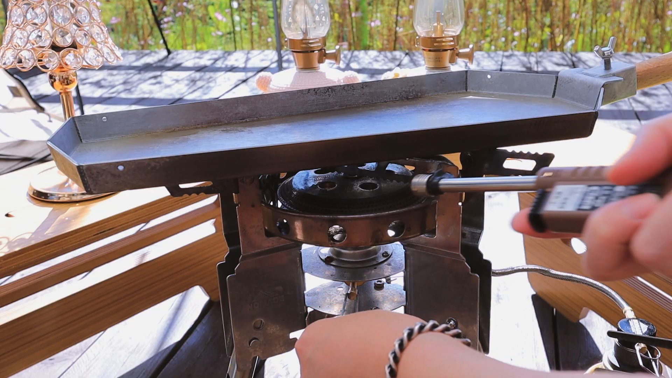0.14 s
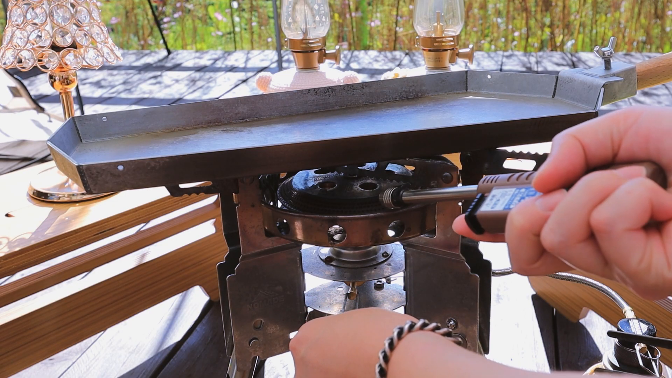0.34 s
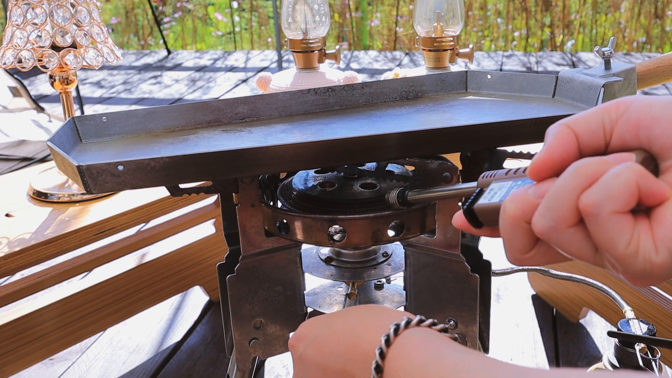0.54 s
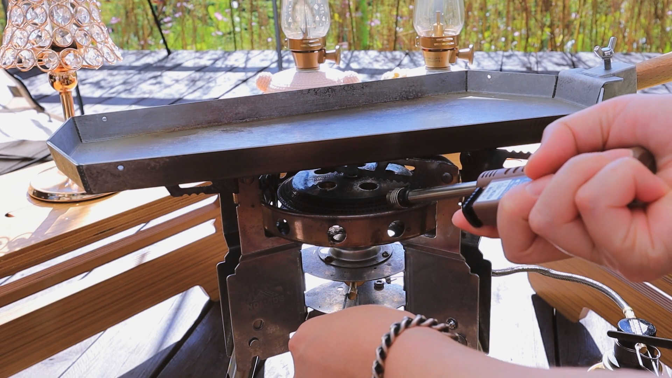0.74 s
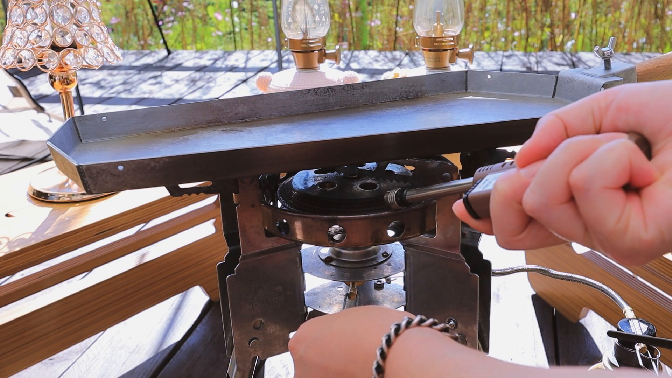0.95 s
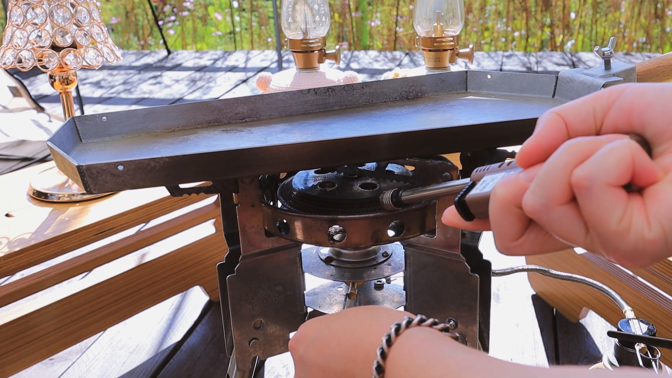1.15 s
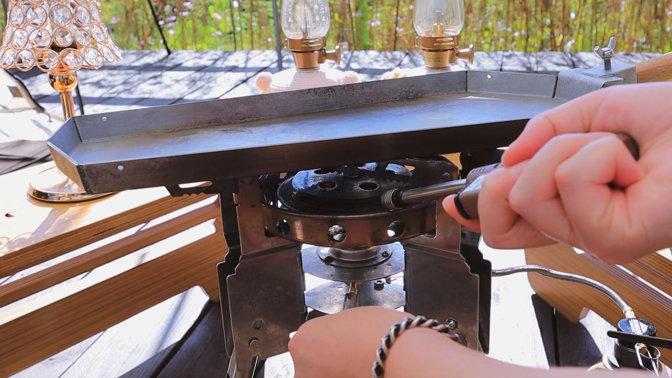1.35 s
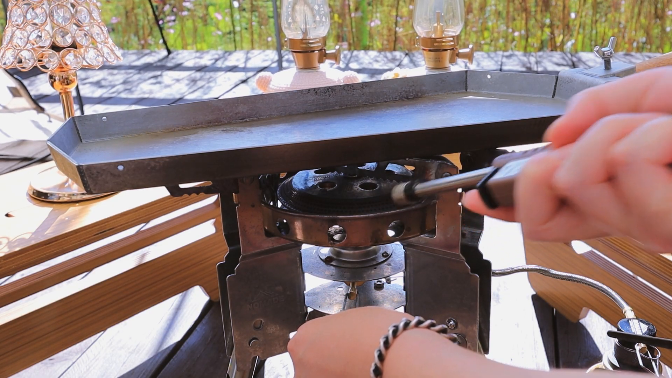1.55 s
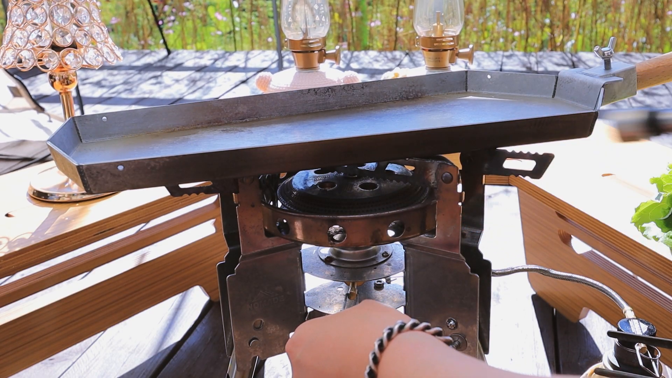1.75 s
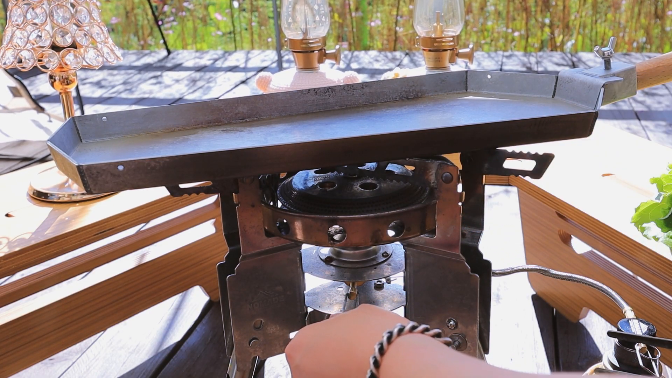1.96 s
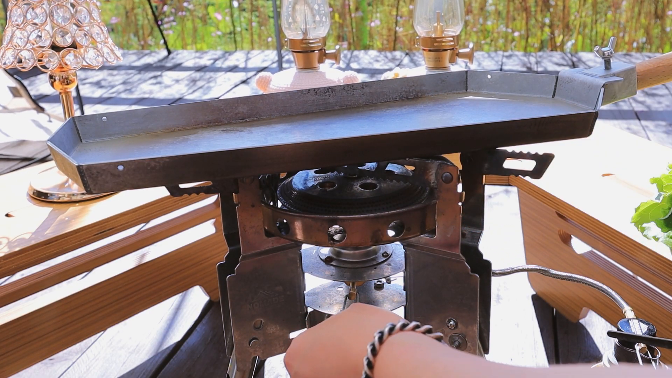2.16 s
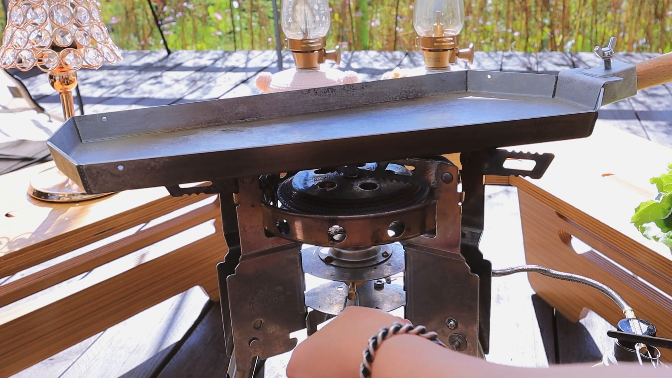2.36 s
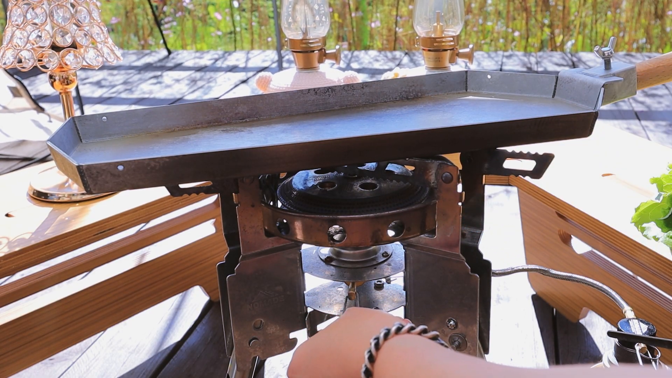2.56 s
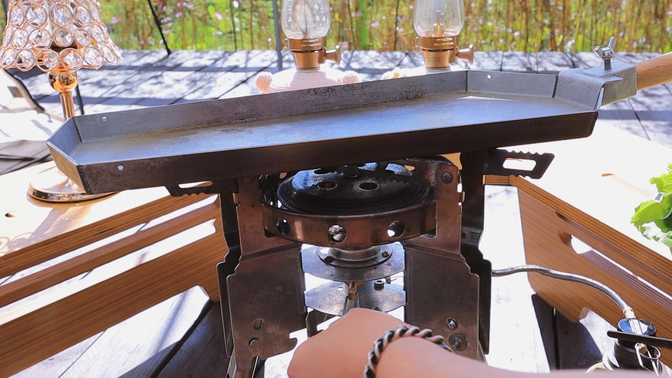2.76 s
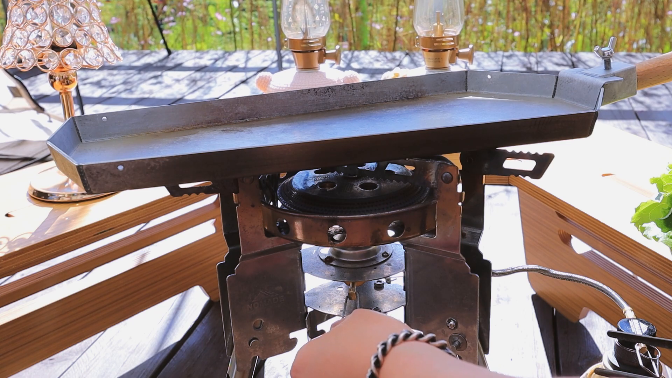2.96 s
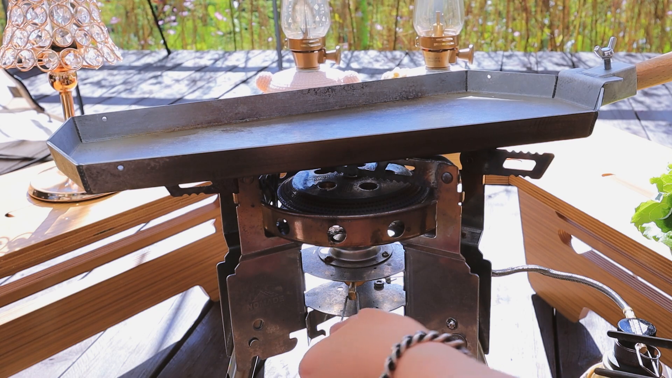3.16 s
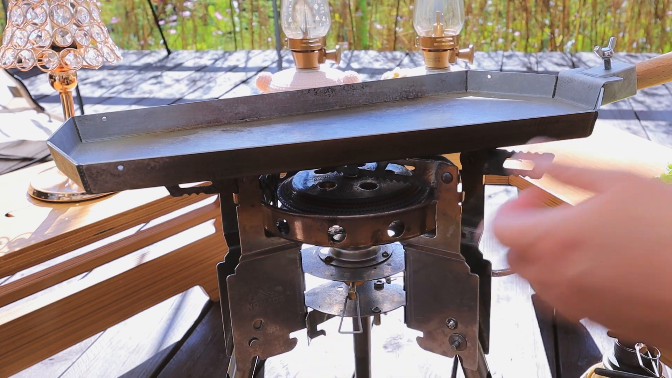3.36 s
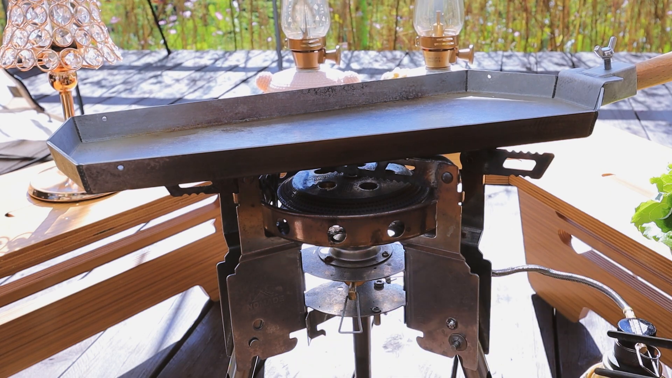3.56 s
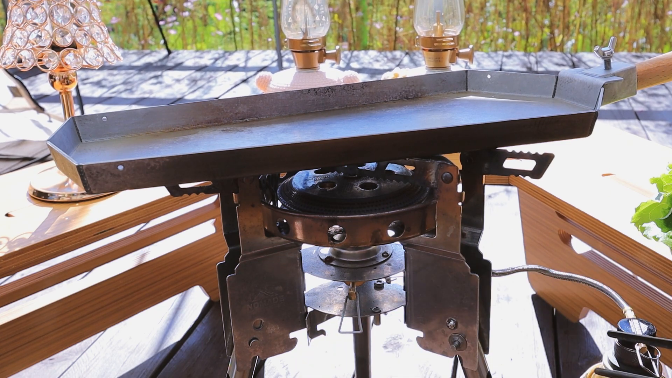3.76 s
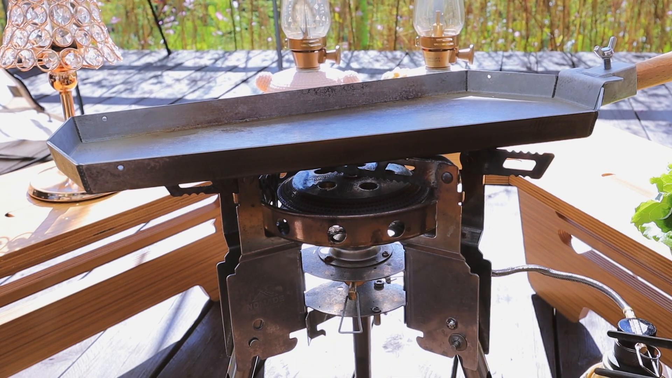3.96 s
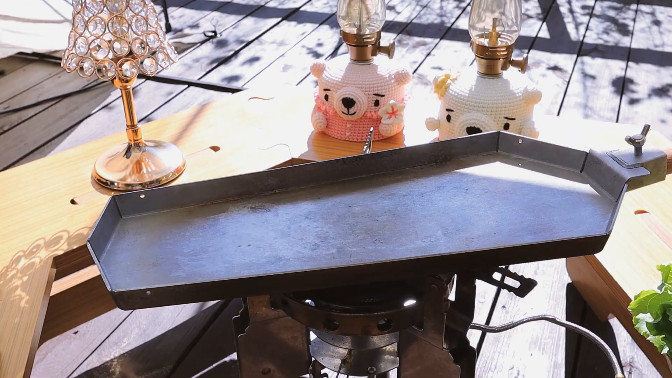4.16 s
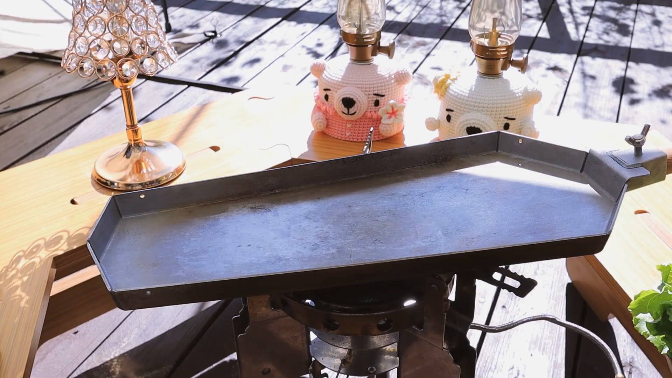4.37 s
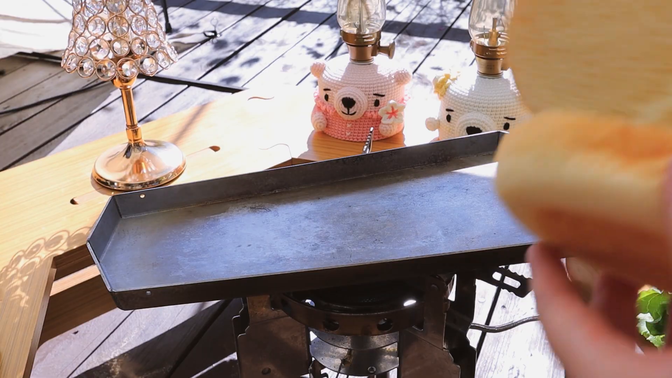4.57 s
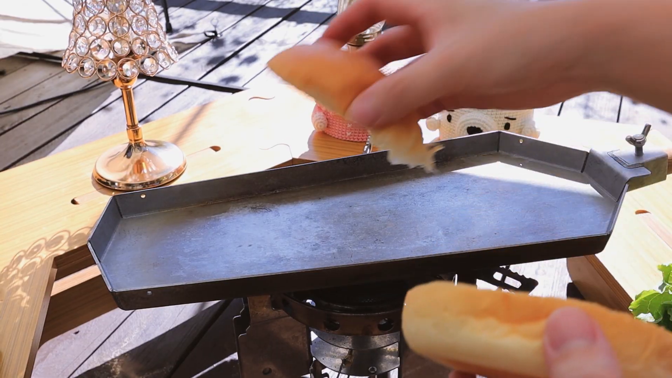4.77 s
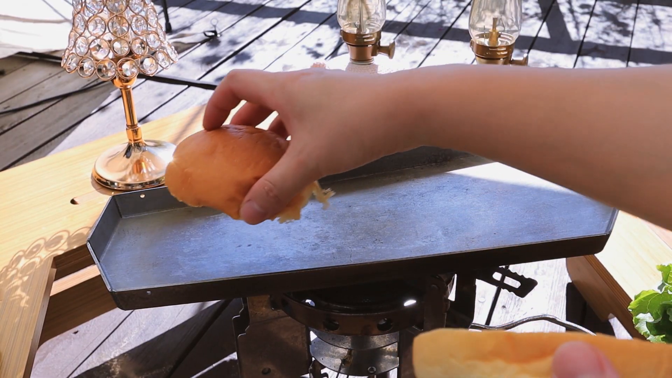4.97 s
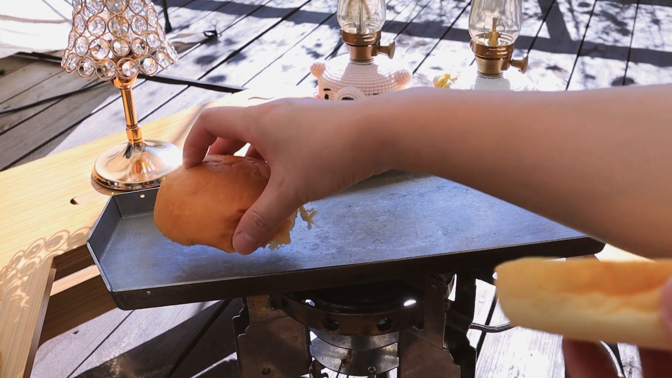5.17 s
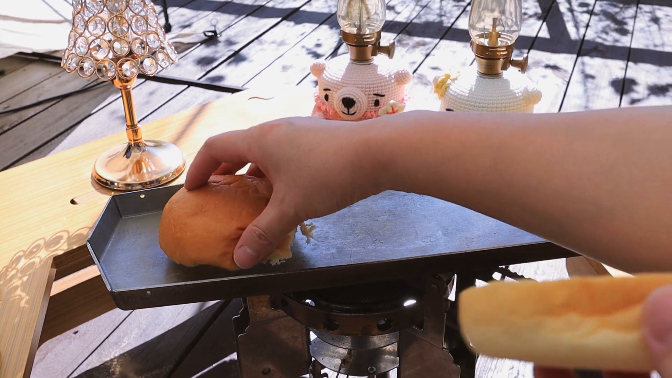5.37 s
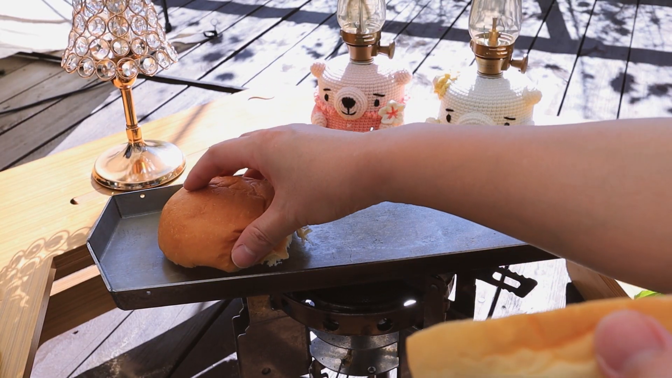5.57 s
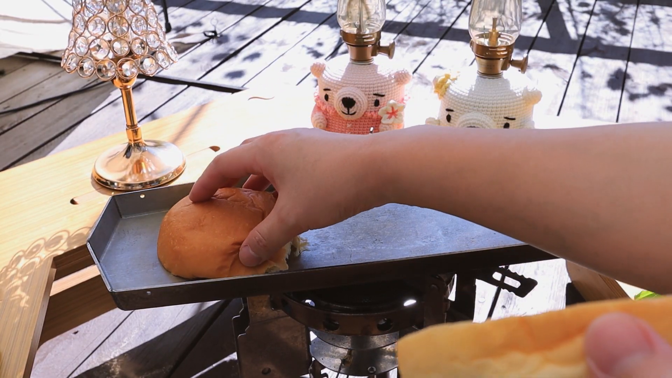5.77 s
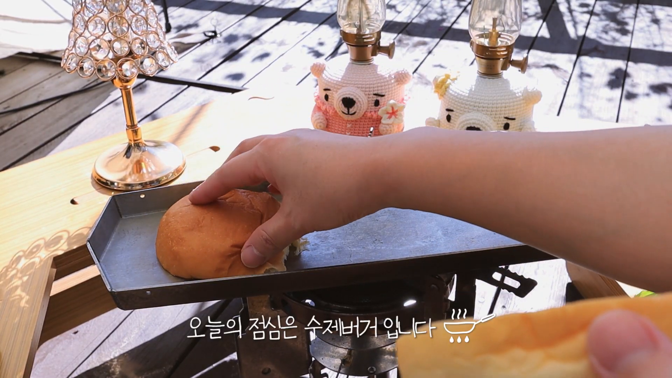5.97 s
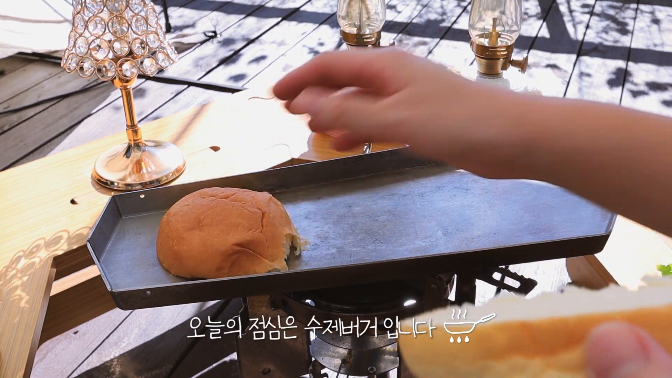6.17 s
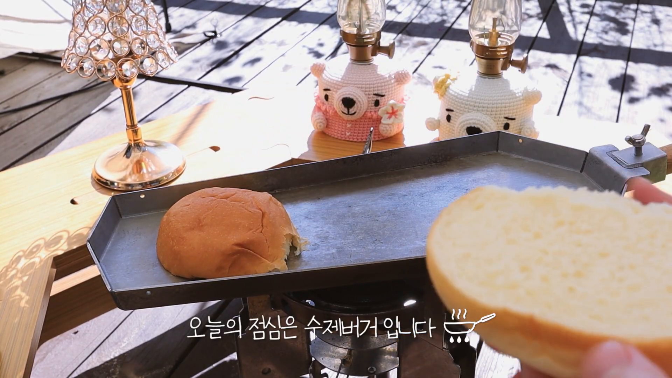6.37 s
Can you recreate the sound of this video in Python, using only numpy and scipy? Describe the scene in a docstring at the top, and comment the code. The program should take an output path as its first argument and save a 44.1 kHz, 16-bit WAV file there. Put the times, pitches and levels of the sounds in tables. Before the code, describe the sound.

Outdoors, close to a small gas stove, unlit gas hisses thinly from the start beneath a constant, very high shimmer of many bush crickets and faint open-air noise with a distant low drone. At 0.37 s steel clinks lightly and rings briefly. A piezo lighter snaps hard at 0.93 s, with a faint return click at 1.16. It snaps again at 1.40; at about 1.44 the gas catches in a short, low double puff, and a clearer release click follows at 1.65. From 2.1 to 2.4 s the hiss swells as the valve opens, with a thin whistle, a growing faint hum and low flame flutter, easing slightly after 2.8. At 4.21 s it abruptly changes to a hollow, muffled roar heard from above. Dry, pitched crust crackles cluster between 4.4 and 5.4 s, over fine crumbling; afterwards roar and crickets continue, with faint crumbling near 6.3.

```python
"""Gas hisses unlit from a camping stove on a wooden deck, amid the shimmer of bush crickets.
Metal clinks and a piezo lighter snaps twice, each by impulses that excite damped modes; the gas catches
with a puff of low noise. The valve is opened and the jet, filtered noise, excites the burner tube.
Then, from above the griddle, the flame is a hollow roar of shaped noise, and a crusty bun crackles
in short pitched bursts as it is laid on."""
import sys
import numpy as np
from scipy import signal
from scipy.fft import rfft, irfft
from scipy.io import wavfile

SR = 44100
rng = np.random.default_rng(int(sys.argv[2]) if len(sys.argv) > 2 else 0)


def generate_wav(signal):
    """Clip the signal to [-1, 1] and save it as 16-bit WAV at the path in sys.argv[1]."""
    frames = np.transpose(np.atleast_2d(signal))
    scaled = np.clip(frames, -1, 1) * 32767
    pcm = np.round(scaled).astype(np.int16)
    wavfile.write(sys.argv[1], SR, pcm)


N = 282917
T = np.arange(N) / SR   # time, s
HZ = np.maximum(np.fft.rfftfreq(N, 1 / SR), 1)   # frequency bins, Hz

# gas flow, given by the level of the jet's hiss: time_s, level_db
GAS_FLOW = [(0, -46.5), (.3, -47.5), (1.3, -45.5), (1.6, -48.5), (2.1, -48), (2.4, -41), (2.8, -40.5),
            (3.4, -42), (4.2, -43.5)]
# resonances of the burner tube and head: frequency_hz, bandwidth_hz, relative_level_db
TUBE_MODES = [(1138, 82, -8), (1572, 140, 0), (1823, 33, 2), (2230, 234, -4), (2735, 160, -7),
              (3070, 76, -5.5), (3530, 130, -11), (5320, 94, -2.5), (6390, 120, -1.5), (7340, 96, 0),
              (11210, 170, -11), (13600, 190, -11)]
# noise spectra, each of them: frequency_hz, relative_density_db (per Hz)
JET_SPECTRUM = [(300, 7), (500, 5.5), (950, -2.5), (2500, 7.5), (3700, 3), (4700, -23.5), (5800, 3),
                (7000, 10.5), (10200, -4), (12000, -8), (14500, -15), (16000, -21)]
FLAME_SIDE_SPECTRUM = [(25, -25), (50, -11.5), (90, -3), (140, -2.5), (190, 1.5), (245, -1), (305, -10.5),
                       (410, -8), (600, -14), (800, -16.5), (1100, -27), (2400, -74)]
FLAME_ABOVE_SPECTRUM = [(25, -27), (55, -10.5), (90, -6), (190, -2), (290, -9), (460, 1.5), (690, -3),
                        (790, -7.5), (980, -7), (1120, -17.5), (1900, -14), (2600, -25.5), (3300, -30),
                        (4100, -22), (5500, -41), (16000, -48)]
OUTDOOR_SPECTRUM = [(25, -14), (55, -24), (88, 1), (125, -9), (200, -0.5), (300, 5), (400, -2), (480, 0),
                    (900, -7), (1700, -11.5), (3500, -13), (15000, -17)]
CRICKET_SPECTRUM = [(5500, -21.5), (6500, -13.5), (7100, -4), (7700, 2), (8600, 1), (9300, -8),
                    (10200, -15.5), (11500, -27), (14000, -46)]
SNAP_SPECTRUM = [(60, -24), (300, -7), (600, -20), (900, 0), (1250, -11), (1800, 2), (2500, -8), (3500, -2),
                 (5000, -4.5), (7000, -3.5), (8500, 2.5), (11500, -14), (14000, -8), (16000, -10)]
RELEASE_SPECTRUM = [(200, -40), (700, -36), (1220, -7), (1720, -15), (2320, 2), (3530, -4.5), (4700, -16),
                    (5580, -15), (7600, -12), (11000, -21), (15500, -25)]
CLINK_SPECTRUM = [(70, -33), (170, -7), (600, -14.5), (1400, -6.5), (2300, -6), (3500, -7), (6300, -0.5),
                  (8700, -5.5), (11500, -8.5), (15500, -13)]
PUFF_SPECTRUM = [(20, 0), (70, -5.5), (170, 1.5), (280, -12.5), (600, -11.5), (1100, -23), (1650, -16),
                 (2400, -30.5), (6000, -38.5), (15000, -63)]
CRUST_SPECTRUM = [(300, -17), (1200, 4.5), (2000, -3), (3300, 1), (5000, -3), (7000, -12), (11000, -17),
                  (16000, -39)]
# far-off droning: frequency_hz, bandwidth_hz, level_db
DRONE_TONES = [(83, 12, -71), (408, 19.4, -59)]
# steel touches steel and rattles: time_s, relative_level_db
CLINK_HITS = [(0.3712, -23.5), (0.3742, -19.5)]
# ring of the stove's steel: frequency_hz, relative_level_db, t60_s
STEEL_MODES = [(174, -11, 0.27), (252, -11, 0.45), (326, -8.5, .28), (835, -13, 0.46), (1030, -19, 0.51),
               (1266, -6, 0.3), (2150, -10, 0.35), (2760, -14, 0.3), (3362, -1, 0.51), (4230, -5, 0.23),
               (4600, -10, 0.3), (4800, -5, 0.29), (5529, -11, .24), (6030, -5, .22), (6245, -7, .2),
               (6300, -6, .2), (7628, -7, .25), (8590, 3, 0.12), (10400, -9, 0.1), (10620, -18, .25),
               (14730, -9, .12)]
# strokes of the piezo hammer: time_s, relative_level_db
SNAP_HITS = [(.9250, 3), (1.4022, 3)]
# the trigger springs back: time_s, relative_level_db
RELEASE_HITS = [(1.1635, -17), (1.6497, -9.5)]
# hollow plastic body of the lighter: frequency_hz, relative_level_db, t60_s
HOUSING_MODES = [(1085, -5.5, 0.01), (1380, -1, 0.0073), (2400, -3, 0.012), (3380, -3, 0.0076),
                 (4900, -12, 0.023), (5190, -17.5, 0.068), (6950, -5, 0.019), (8520, -3.5, 0.016),
                 (8950, -4.5, 0.012), (12450, -6.5, 0.01)]
# the gas catches, port after port: time_s, relative_level_db
PUFF_HITS = [(1.4440, -11.5), (1.4557, -15), (1.477, -31.5), (1.851, -33.5)]
# air under the griddle, set swinging by a puff: frequency_hz, relative_level_db, t60_s
CAVITY_MODES = [(78, -8, 0.076), (192, -2.5, 0.047)]
# the crust's big cracks: time_s, relative_level_db, pitch_hz, relative_treble_db
BIG_CRACKS = [(4.359, -30.5, 3850, -19), (4.4727, -30.5, 4800, -25), (4.523, -28, 2660, -24),
              (4.7053, -36, 3190, -20), (4.8351, -22, 4100, -11), (4.9412, -24, 3520, -22),
              (4.9641, -27.5, 5950, -15), (4.982, -24.5, 3290, -28), (5.0432, -24.5, 2850, -31),
              (5.0908, -23.5, 4370, -27), (5.1533, -26, 4870, -27), (5.1917, -25, 3290, -28),
              (5.2459, -21.5, 2800, -9), (5.3011, -26.5, 2640, -24), (5.406, -26.5, 2970, -11)]
# fingers squeeze the bun: firmest_grip_s, crumbling_level_db
GRIP_SQUEEZES = [(4.8, -52), (6.3, -63)]

MOVE_S = 4.21   # from here on the stove is heard from above the griddle
# "FOLLOWS" is the share of the flow's swing in dB that a sound takes
REFERENCE_FLOW_DB = -42   # flow at which the levels of singing, flame and sizzle hold
SING_HZ, SING_WIDTH_HZ, SING_DB, SING_FOLLOWS = 3961, 150, -47, 0.46
SING_UNLIT_DB, DRAW_S = -9.5, 0.26   # change while unlit; time for the flame to draw air
SIZZLE_HZ, SIZZLE_WIDTH_HZ, SIZZLE_DB, SIZZLE_FOLLOWS = 13500, 800, -56, .7   # thin, at the nozzle
HUM_HZ, HUM_COLD_DB, HUM_HOT_DB, WARM_UP_S = 707, -65, -55, 2.1
FLAME_DB, FLAME_FOLLOWS, FLAME_ABOVE_DB = -42.5, 0.67, 3.5   # the last is a gain from above
GRIP_HOLD_S, GRIP_RISE_DB_PER_S, GRIP_FALL_DB_PER_S = 0.46, 22, 55
# small cracks: rate at the firmest grip, relative levels and range of pitch
CHIPS_PER_S, CHIP_DB, CHIP_SPREAD_DB, CHIP_TREBLE_DB = 16, -32.5, 3, -24
CHIP_LOW_HZ, CHIP_HIGH_HZ = 2580, 5100
STOPBAND_HZ = 16400


def from_db(db):
    """Decibels are logarithmic: 20 dB is a factor of ten in amplitude."""
    return 10 ** (np.asarray(db) / 20)


def rms_one(x):
    """Normalization: dividing by the root mean square gives unit rms."""
    return x / np.sqrt(np.mean(x ** 2) + 1e-20)


def noise(spectrum):
    """Spectral shaping: white noise weighted over log frequency becomes coloured noise of rms 1."""
    hz, db = np.transpose(spectrum)
    weights = from_db(np.interp(np.log(HZ), np.log(hz), db))
    return rms_one(irfft(rfft(rng.standard_normal(N)) * weights, N))


def flutter(rate_hz, depth_db):
    """Random amplitude modulation: low-passed noise gives a gain wandering by depth_db rms."""
    slow = irfft(rfft(rng.standard_normal(N)) / (1 + (HZ / rate_hz) ** 2), N)
    return from_db(depth_db * rms_one(slow))


def resonate(x, hz, width_hz):
    """Resonance: a pole pair near the unit circle passes a narrow band with a peak gain near 1."""
    radius = np.exp(-np.pi * width_hz / SR)
    numerator = np.array([1, 0, -1]) * (1 - radius * radius) / 2
    denominator = [1, -2 * radius * np.cos(2 * np.pi * hz / SR), radius * radius]
    return signal.lfilter(numerator, denominator, x)


def whistle(hz, width_hz):
    """Cascaded resonance: noise through two resonators becomes a wavering near-tone of rms 1."""
    narrow = resonate(rng.standard_normal(N), hz, width_hz)
    return rms_one(resonate(narrow, hz, 2 * width_hz))


def hum(hz):
    """Phase accumulation: summing a very slightly wandering frequency gives a tone of rms 1."""
    pitch_hz = hz * flutter(rate_hz=4, depth_db=.012)
    return np.sqrt(2) * np.sin(2 * np.pi * np.cumsum(pitch_hz) / SR)


def dying(hits, t60, rise=.0001):
    """Exponential decay: each hit (time_s, level_db) rises fast and falls 60 dB in t60 seconds."""
    envelope = np.zeros(N)
    for s, db in hits:
        start = int(s * SR)
        age = T[:min(N - start, int(2 * t60 * SR))]
        onset = 1 - np.exp(-age / rise)
        envelope[start:start + len(age)] += from_db(db - 60 * age / t60) * onset
    return envelope


def ring(modes, hits):
    """Modal superposition: each hit (time_s, level_db) starts all damped modes of a body."""
    knocks = np.zeros(N)
    for s, db in hits:
        knocks[int(s * SR)] += from_db(db)
    age = T[:SR]
    tone = np.zeros(len(age))
    for k, (hz, db, t60) in enumerate(modes):
        polarity = (-1) ** k
        tone += polarity * from_db(db - 60 * age / t60) * np.sin(2 * np.pi * hz * age)
    return signal.fftconvolve(knocks, tone)[:N]


def flow(follows=1):
    """Flow dependence: a gain takes a share of the flow's dB swing; it is 1 at the reference flow."""
    return from_db(follows * (np.interp(T, *np.transpose(GAS_FLOW)) - REFERENCE_FLOW_DB))


def since_lit(rise_s):
    """Linear growth: goes from 0 to 1 within rise_s once the gas has caught."""
    return np.clip((T - PUFF_HITS[0][0]) / rise_s, 0, 1)


def gas_jet():
    """Jet turbulence hisses and excites tube modes; one sings as the flame draws air, one hums when warm."""
    tube = np.zeros(N)
    for hz, width_hz, db in TUBE_MODES:
        tube += from_db(db) * resonate(rng.standard_normal(N), hz, width_hz)
    turbulence = from_db(-1.0) * rms_one(tube) + from_db(-8.5) * noise(JET_SPECTRUM)
    hiss = from_db(REFERENCE_FLOW_DB) * flow() * turbulence

    sing_gain = from_db(SING_DB + SING_UNLIT_DB * (1 - since_lit(DRAW_S))) * flow(SING_FOLLOWS)
    singing = sing_gain * whistle(SING_HZ, SING_WIDTH_HZ)

    hum_gain = from_db(HUM_COLD_DB + (HUM_HOT_DB - HUM_COLD_DB) * since_lit(WARM_UP_S))
    humming = hum_gain * hum(HUM_HZ)

    sizzle_gain = from_db(SIZZLE_DB) * flow(SIZZLE_FOLLOWS) * flutter(rate_hz=3, depth_db=2.2)
    sizzle = sizzle_gain * whistle(SIZZLE_HZ, SIZZLE_WIDTH_HZ)
    return (hiss + singing + humming + sizzle) * flutter(rate_hz=42, depth_db=.5)


def crickets():
    """Incoherent addition: many distant bush crickets merge into one high, shimmering band."""
    shimmer = flutter(rate_hz=190, depth_db=0.43) * flutter(rate_hz=1, depth_db=0.53)
    return from_db(-43.0) * noise(CRICKET_SPECTRUM) * shimmer


def outdoors():
    """Broadband background: quiet open air is wavering noise, with narrow-band drones far away."""
    air = from_db(-54) * noise(OUTDOOR_SPECTRUM) * flutter(rate_hz=5.3, depth_db=1.9)
    drone = sum(from_db(db) * whistle(hz, width_hz) for hz, width_hz, db in DRONE_TONES)
    return air + drone


def clink():
    """Impact excitation: contacts clatter as noise, and the last leaves the steel's modes ringing."""
    contact = dying(CLINK_HITS, t60=0.048, rise=0.00065)
    tail = from_db(-10.5) * dying(CLINK_HITS, t60=0.18, rise=0.0045)
    clatter = noise(CLINK_SPECTRUM) * (contact + tail)
    return clatter + from_db(-12.5) * ring(STEEL_MODES, CLINK_HITS[-1:])


def lighter():
    """Impulse response: hard snaps ring the housing and scatter off stove and table; returns are softer."""
    # the spark is a bright crack; the knock below it comes from the housing
    high_pass = signal.butter(2, 2200, "high", fs=SR, output="sos")
    spark = signal.sosfilt(high_pass, noise(SNAP_SPECTRUM) * dying(SNAP_HITS, t60=0.012))
    snaps = from_db(-2.5) * spark + from_db(-7) * ring(HOUSING_MODES, SNAP_HITS)
    scatter = from_db(-23.5) * noise(SNAP_SPECTRUM) * dying(SNAP_HITS, t60=0.11, rise=0.0046)

    return_click = dying(RELEASE_HITS, t60=0.0068)
    return_tail = from_db(-21.5) * dying(RELEASE_HITS, t60=0.058, rise=.002)
    returns = noise(RELEASE_SPECTRUM) * (return_click + return_tail)
    return snaps + scatter + returns


def ignition():
    """Rapid gas expansion: pooled gas starts to burn, then puffs low and swings the cavity's air."""
    first_flame = dying([(1.436, -12.5)], t60=0.083, rise=0.01)
    puffs = from_db(-1.5) * dying(PUFF_HITS, t60=0.043, rise=0.0011)
    rush = noise(PUFF_SPECTRUM) * (first_flame + puffs)
    return rush + from_db(-.5) * ring(CAVITY_MODES, PUFF_HITS)


def flame(spectrum):
    """Unsteady combustion: the flame roars once the gas has caught, louder with more gas."""
    unsteadiness = flutter(rate_hz=70, depth_db=1.66) * flutter(rate_hz=14, depth_db=0.65)
    level = since_lit(.023) * from_db(FLAME_DB) * flow(FLAME_FOLLOWS)
    return level * noise(spectrum) * unsteadiness


def grip():
    """Loading and release: each squeeze builds slowly in dB, holds and lets go faster."""
    pressure = np.zeros(N)
    for s, db in GRIP_SQUEEZES:
        before = GRIP_RISE_DB_PER_S * np.maximum(s - T, 0)
        after = GRIP_FALL_DB_PER_S * np.maximum(T - s - GRIP_HOLD_S, 0)
        pressure += from_db(db - before - after)
    return pressure * (T > MOVE_S)


def chips(pressure):
    """Poisson process: small cracks come at random, more often under a firm grip; rows as in BIG_CRACKS."""
    chance = CHIPS_PER_S * (pressure / pressure.max()) ** 2 / SR
    rows = []
    for s in T[rng.random(N) < chance]:
        db = CHIP_DB + CHIP_SPREAD_DB * rng.standard_normal()
        pitch_hz = CHIP_LOW_HZ + (CHIP_HIGH_HZ - CHIP_LOW_HZ) * rng.random()
        rows.append((s, db, pitch_hz, CHIP_TREBLE_DB))
    return rows


def bun():
    """Brittle fracture: dry cracks, each flake with its own pitch, lie over a fine crumbling."""
    pressure = grip()
    # about 260 crumbs a second, heard in two bands
    crumbs = (rng.random(N) < 260 / SR) * rng.standard_normal(N)
    crumbling = rms_one(resonate(crumbs, 1240, 800) - from_db(-8.0) * resonate(crumbs, 4500, 2400))

    cracks = BIG_CRACKS + chips(pressure)
    crack_hits = [(s, db) for s, db, hz, treble in cracks]
    treble_hits = [(s, db + treble) for s, db, hz, treble in cracks]
    flakes = sum(ring([(hz, 0, .003)], [(s, db)]) for s, db, hz, treble in cracks)
    tearing = noise(CRUST_SPECTRUM) * dying(crack_hits, t60=0.0098)
    high_pass = signal.butter(2, 7000, "high", fs=SR, output="sos")
    edge = signal.sosfilt(high_pass, rng.standard_normal(N)) * dying(treble_hits, t60=.003)
    return from_db(-0.5) * flakes + from_db(-4.5) * tearing + from_db(12) * edge + pressure * crumbling


def scene():
    """Acoustic shielding: from above, the griddle hides the jet and the gap under it colours the flame."""
    above = np.clip((T - MOVE_S) / 0.003, 0, 1)
    from_side = gas_jet() + flame(FLAME_SIDE_SPECTRUM)
    from_above = from_db(FLAME_ABOVE_DB) * flame(FLAME_ABOVE_SPECTRUM)
    stove = (1 - above) * from_side + above * from_above
    return (stove + crickets() + outdoors() + clink() + lighter() + ignition() + bun())[None]


def record(dry):
    """Overload and band limiting: peaks beyond full scale are clipped, then a steep low-pass cuts the top."""
    low_pass = signal.cheby2(14, 60, STOPBAND_HZ, fs=SR, output="sos")
    return signal.sosfilt(low_pass, np.clip(dry, -1, 1))


dry = scene()
out = record(dry)
generate_wav(out)
```